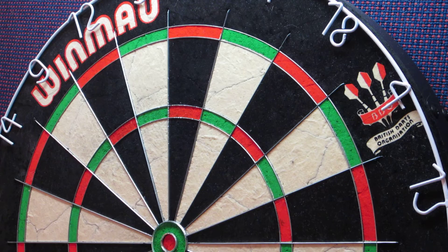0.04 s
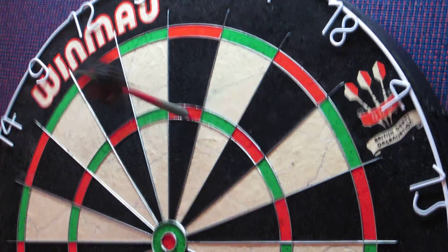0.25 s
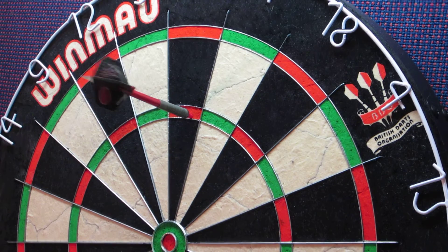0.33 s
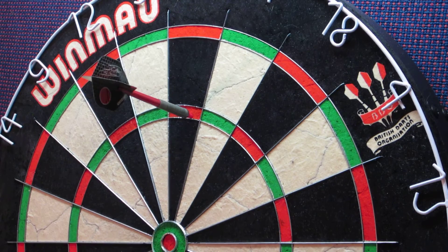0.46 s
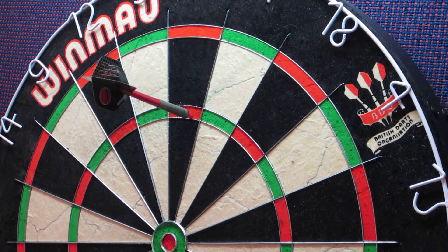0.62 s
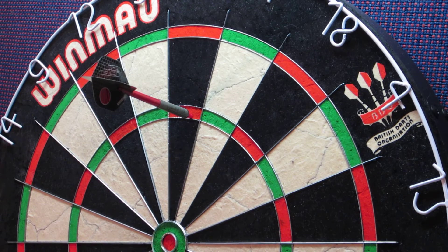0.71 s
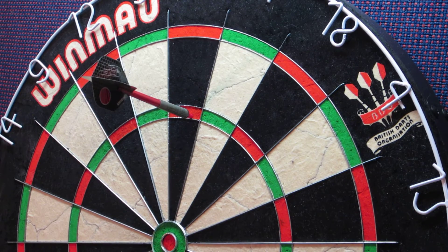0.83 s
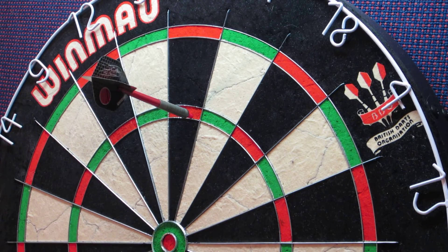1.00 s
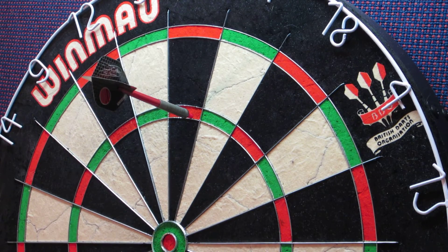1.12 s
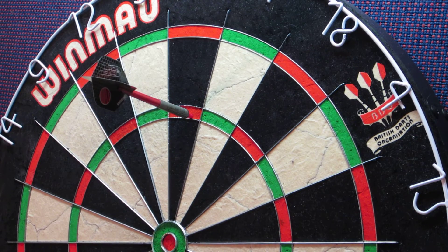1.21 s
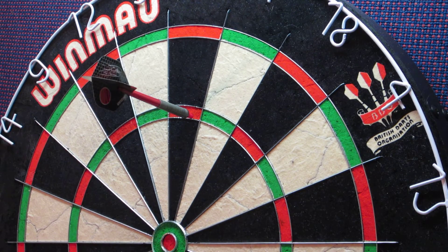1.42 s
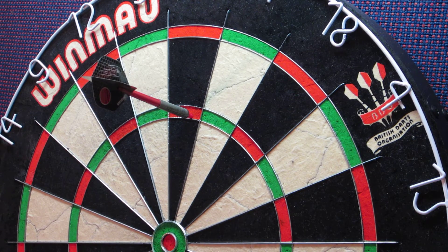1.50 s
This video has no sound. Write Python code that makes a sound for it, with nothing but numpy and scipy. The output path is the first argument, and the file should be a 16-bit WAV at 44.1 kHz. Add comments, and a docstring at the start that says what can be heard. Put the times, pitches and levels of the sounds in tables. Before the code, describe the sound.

Single dart thudding hard into a dartboard up close, short room echo, low background hum

```python
"""A dart hits a dartboard

A steel-tipped dart hits a bristle board close to the microphone, in a small quiet room with a low hum.
The point's tick is a burst of coloured noise; the dart and the board ring as sets of fading sine waves.
Milliseconds after the tick the board takes the blow and thuds against its mount, and a wall echoes it.
The room answers with fading noise and slow ringing; rustles and a dull opening sound are shaped noise.
"""
import sys
import numpy as np
from scipy import signal
from scipy.fft import rfft, irfft, next_fast_len
from scipy.io import wavfile
from scipy.ndimage import map_coordinates

SR = 44100
rng = np.random.default_rng(int(sys.argv[2]) if len(sys.argv) > 2 else 0)


def unload_audio(sound):
    """Save the sound as a 16-bit wav file, at the path given as the first command line argument."""
    columns = np.transpose(np.atleast_2d(sound))
    # keep every value between -1 and 1, then stretch to whole-number steps
    steps = np.round(np.clip(columns, -1, 1) * 32767)
    wavfile.write(sys.argv[1], SR, steps.astype(np.int16))


N = 68355  # length of the sound (samples)

TOUCH_S = 0.2311  # the point touches the board (s)
THUD_S = 0.23502  # the board takes the blow (s)

# How alike left and right are in the room's tail and soft noises: (frequency [Hz], likeness [-1 to 1])
ROOM_ALIKE = [(100, 0.73), (500, 0.9), (1200, 0.83), (2500, .7), (8000, 0.22)]


def amp(db):
    """Turn decibels into a gain."""
    return 10 ** (np.asarray(db) / 20)


def unit(x):
    """Scale a sound to an rms (average strength) of 1."""
    return x / np.sqrt(np.mean(x ** 2) + 1e-20)


def along(points, hz):
    """Read a value between (frequency, value) points, with frequency on a log axis."""
    point_hz, value = np.transpose(points)
    return np.interp(np.log(hz + 1), np.log(point_hz + 1), value)


def since(s):
    """Seconds since a moment, zero before it."""
    return np.maximum(np.arange(N) / SR - s, 0)


def pan(db):
    """Left and right gains for a level difference: positive leans left, negative leans right."""
    return amp(np.array([[0.5], [-0.5]]) * db)


def filtered(x, response):
    """Multiply each frequency of a sound by a response."""
    padded = next_fast_len(N + SR // 2)  # spare room so that the end does not wrap onto the start
    hz = np.fft.rfftfreq(padded, 1 / SR)
    return irfft(rfft(x, padded) * response(hz), padded)[..., :N]


def noise(colour, alike):
    """Stereo noise of rms 1: a shared middle and an opposed side set how alike left and right are."""
    def middle_and_side(hz):
        angle = np.arccos(np.clip(along(alike, hz), -1, 1)) / 2
        return colour(hz) * np.array([np.cos(angle), np.sin(angle)])

    middle, side = filtered(rng.standard_normal((2, N)), middle_and_side)
    return unit(np.array([middle + side, middle - side]))


def band(centre_hz, octaves):
    """A bell-shaped colour around one frequency."""
    return lambda hz: np.exp(-0.5 * (np.log2((hz + 1) / centre_hz) / octaves) ** 2)


def dying(t, t60):
    """Exponential decay that falls by 60 dB in t60 seconds."""
    return np.exp(-np.log(1000) * t / t60)


def struck(s, rise, t60):
    """An envelope that rises at moment s and dies away."""
    t = since(s)
    return (1 - np.exp(-t / rise)) * dying(t, t60)


def ring(modes, s, rise):
    """Add up an object's modes (its natural tones), all set off at s and each dying at its own speed."""
    return sum(amp(db) * struck(s, rise, t60) * np.sin(2 * np.pi * hz * since(s))
               for hz, db, t60 in modes)


def hum():
    """Steady low tones whose phases drift smoothly and at random, so they waver slightly."""
    # The hum's tones: (frequency [Hz], level [dB rms])
    hum_tones = [(59.2, -72.5), (134.6, -63), (215.3, -64), (495.3, -69.5), (689.1, -66.5), (807.5, -68)]
    drift_radians, drift_rate = 0.63, 6.55  # size of the drift; random points a second
    t = since(0)
    total = 0
    for hz, db in hum_tones:
        start_turn = rng.random()
        drift = map_coordinates(rng.standard_normal(64), [t * drift_rate], mode="mirror")
        phase = 2 * np.pi * (hz * t + start_turn) + drift_radians * drift
        total = total + amp(db) * np.sqrt(2) * np.sin(phase)
    return total


def room_air():
    """Steady room noise, mostly low, that thins out at the very bottom."""
    # Colour of the room noise: (frequency [Hz], relative level [dB])
    air_colour = [(15, -20), (25, -13), (64, -0.5), (96, -11), (134, -4), (171, -16), (209, -4.5),
                  (260, -12), (331, -10), (366, -12), (668, -16.5), (738, -18.5), (816, -17), (3000, -32),
                  (3900, -63), (6600, -120)]
    # How alike left and right are: (frequency [Hz], likeness [-1 to 1])
    air_alike = [(60, 0.59), (180, 0.44), (550, -0.15), (1650, -0.095), (4970, -0.46), (15000, -0.44)]
    level_db, rumble_cut_hz = -47.5, 36

    def colour(hz):
        return amp(along(air_colour, hz)) * hz / np.hypot(hz, rumble_cut_hz)

    return amp(level_db) * noise(colour, air_alike)


def recorder_hiss():
    """The recorder's faint steady hiss, made as coloured noise."""
    # Colour of the hiss: (frequency [Hz], relative level [dB])
    hiss_colour = [(1760, -48), (3000, -20), (3240, 0.5), (7420, -4.5), (9730, -11.5), (12000, -18.5),
                   (15100, -10), (16000, -29), (16500, -45)]
    # How alike left and right are: (frequency [Hz], likeness [-1 to 1])
    hiss_alike = [(3000, 0), (10000, 0)]
    level_db = -69
    return amp(level_db) * noise(lambda hz: amp(along(hiss_colour, hz)), hiss_alike)


def opening_sound():
    """A dull sound dying away at the start, made as a band of noise."""
    level_db, centre_hz, octaves = -42.5, 580, 0.94
    envelope = struck(0, rise=0.0016, t60=0.2)
    return amp(level_db) * envelope * noise(band(centre_hz, octaves), ROOM_ALIKE)


def dart():
    """The point snaps on the surface and crunches into the fibres; the dart's modes ring for an instant."""
    # Colour of the point's crack: (frequency [Hz], relative level [dB])
    crack_colour = [(1000, 1.5), (2500, -3), (3500, -7.5), (5100, -1), (6600, -15), (9000, -11),
                    (12000, -17), (15500, -11), (17000, -35)]
    # Modes of the dart: (frequency [Hz], level before the rise, decay and panning [dB], t60 [s])
    dart_modes = [(1523, -25.5, 0.035), (3520, -30.5, 0.024), (4970, -22.5, 0.013), (5270, -18, 0.012),
                  (5450, -27, 0.018), (10170, -35, 0.0085)]
    crack_db, crack_t60_s = -35, 0.0098
    snap_db, snap_t60_s = 11, 0.0026  # the first instant, relative to the crunch
    sink_s = 0.004  # time the point takes to sink in
    lean_db = 3.5  # left over right

    def colour(hz):
        return amp(along(crack_colour, hz)) * hz / (hz + 500)  # the bass is thinned

    crack = noise(colour, [(1000, 0.6)])
    # The crunch holds steady while the point sinks in, then dies away.
    crunch = (since(TOUCH_S) > 0) * dying(since(TOUCH_S + sink_s), crack_t60_s)
    snap = amp(snap_db) * struck(TOUCH_S, 0.00005, snap_t60_s)
    ringing = ring(dart_modes, TOUCH_S, rise=0.0013)
    return pan(lean_db) * (amp(crack_db) * (crunch + snap) * crack + ringing)


def board():
    """The board's damped modes and a hard knock on its mount, repeated dully by a wall to one side."""
    # Modes of the board: (frequency [Hz], level before the rise and decay [dB], t60 [s])
    board_modes = [(112.6, -21, 0.08), (260, -22, 0.066), (462, -8, 0.048), (500, -32, 0.023),
                   (730, -10, 0.048), (870, -11.5, 0.037), (993.4, -7, 0.053), (1038, -2.5, 0.028),
                   (1235, -22, 0.041), (1377, -16, 0.065), (1804, -21.5, 0.071), (1943, -10.5, .035),
                   (2436, -24.5, 0.016)]
    attack_s = 0.0034
    knock_s, knock_db, knock_hz, knock_half_s = 0.23858, -5.5, 960, 0.00056  # the board meets its mount
    echo_s, echo_db, echo_top_hz = 0.02375, -11.5, 4000  # delay, level and dullness
    echo_lag_s = 0.00014  # the echo reaches the left side later

    t = np.arange(N) / SR - knock_s
    knock = amp(knock_db) * np.exp(-(t / knock_half_s) ** 2) * np.sin(2 * np.pi * knock_hz * t)
    thud = knock - ring(board_modes, THUD_S, attack_s)
    delay = echo_s + echo_lag_s * np.array([[0.5], [-0.5]])

    def wall(hz):
        delayed = np.exp(-2j * np.pi * hz * delay)  # turning each tone's phase delays it
        return delayed / (1 + (hz / echo_top_hz) ** 2)

    return thud + amp(echo_db) * filtered(thud, wall)


def room():
    """A diffuse tail, each frequency dying at its own speed, and slow ringing of the mount and room."""
    # Colour of the tail: (frequency [Hz], relative level [dB])
    tail_colour = [(50, -21), (100, -12.5), (200, -10.5), (345, -21.5), (430, -4.5), (560, -17.5),
                   (720, -4), (890, -12), (1050, -9), (1350, -12.5), (1850, -10), (2500, -22.5),
                   (3300, -30), (4400, -35.5), (5300, -29.5), (6500, -47), (10000, -47), (12000, -51),
                   (15000, -50), (17000, -68)]
    # Decay of the tail: (frequency [Hz], t60 [s])
    tail_decay = [(100, 0.36), (500, 0.33), (1000, 0.25), (2000, 0.21), (5000, 0.16), (12000, 0.16)]
    # Modes of the mount and the room: (frequency [Hz], level before the rise and decay [dB], t60 [s])
    ringing_modes = [(91.3, -29, 0.29), (222.2, -28.5, 0.48), (417.7, -12, 0.16), (457.5, -27, 0.26),
                     (567.6, -27, 0.22), (683, -30.5, 0.31), (726, -23, 0.24), (970, -24, 0.21),
                     (1318, -30, 0.15), (1722, -28, 0.13)]
    tail_db, tail_rise_s, ringing_attack_s = -23, 0.0036, 0.027

    steady = noise(lambda hz: amp(along(tail_colour, hz)), ROOM_ALIKE)
    # Split the noise into short slices of frequencies, fade each frequency, then join them again.
    hz, t, slices = signal.stft(steady, SR, nperseg=512)
    decay = dying(np.maximum(t - THUD_S, 0), along(tail_decay, hz)[:, None])
    tail = signal.istft(slices * decay, SR, nperseg=512)[1][:, :N]
    rise = 1 - np.exp(-since(TOUCH_S) / tail_rise_s)
    return amp(tail_db) * tail * rise + ring(ringing_modes, THUD_S, ringing_attack_s)


def rustles():
    """Faint soft noises in the room: bands of noise that swell and die away."""
    # The rustles: (time [s], level before the rise and decay [dB], centre [Hz], width [octaves],
    # rise [s], t60 [s])
    rustle_list = [(.416, -63.5, 6000, 0.36, .003, 0.13), (0.496, -54.5, 3600, 0.51, .0005, 0.1),
                   (.515, -62, 3600, 0.63, 0.011, 0.39), (.58, -50, 1520, 0.35, 0.0069, 0.3),
                   (.585, -65, 5770, 0.42, 0.0054, 0.29), (1.04, -57, 1900, 0.22, 0.035, 0.55),
                   (1.05, -64.5, 5400, 0.35, .01, 0.31), (1.091, -64, 7500, 0.54, .001, 0.05)]
    total = 0
    for s, db, hz, octaves, rise, t60 in rustle_list:
        total = total + amp(db) * struck(s, rise, t60) * noise(band(hz, octaves), ROOM_ALIKE)
    return total


def scene():
    """The hit in its room; in all but the dart, the bass leans a little to the right."""
    # Left-right balance: (frequency [Hz], left minus right [dB])
    balance = [(60, -3.5), (400, -1), (1500, 0), (5000, 1), (12000, 0.5)]
    background = hum() + room_air() + recorder_hiss()
    surroundings = background + opening_sound() + board() + room() + rustles()
    return dart() + filtered(surroundings, lambda hz: pan(along(balance, hz)))


def record(dry):
    """The microphone's narrow treble dip, and a steep low-pass that leaves nothing above about 16.5 kHz."""
    dip_db, dip_hz, dip_octaves = -10, 12380, 0.13
    top_hz = 16500

    def response(hz):
        dip = amp(dip_db * band(dip_hz, dip_octaves)(hz))
        low_pass = 1 / np.sqrt(1 + (hz / top_hz) ** 160)
        return dip * low_pass

    return filtered(dry, response)


dry = scene()
out = record(dry)
unload_audio(out)
```